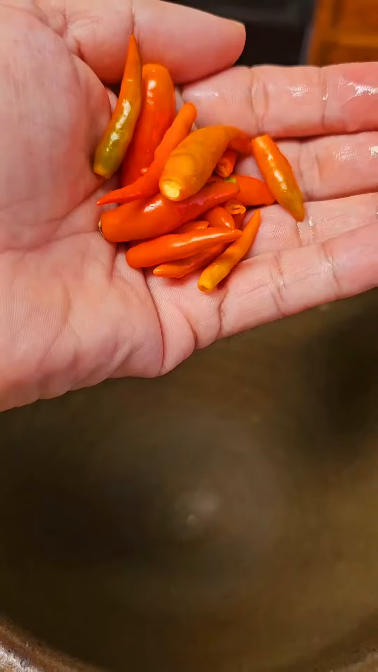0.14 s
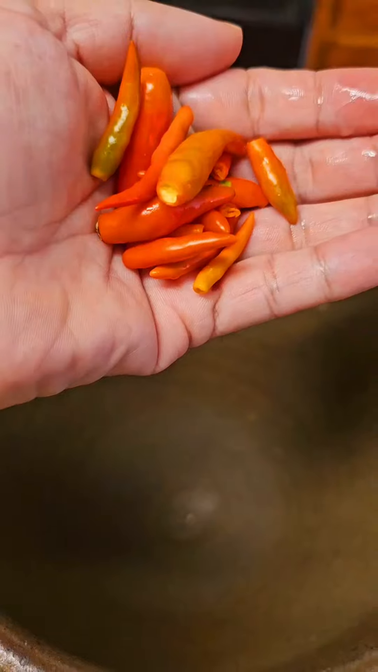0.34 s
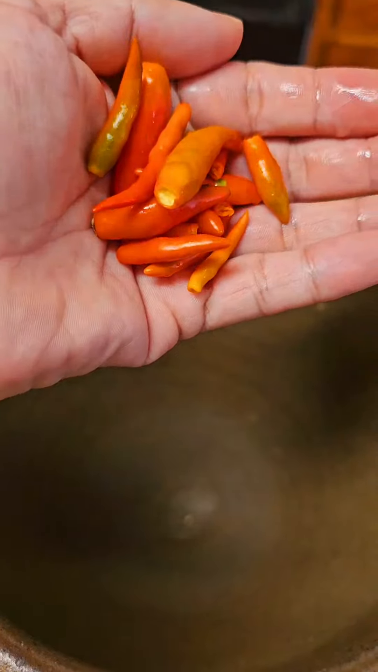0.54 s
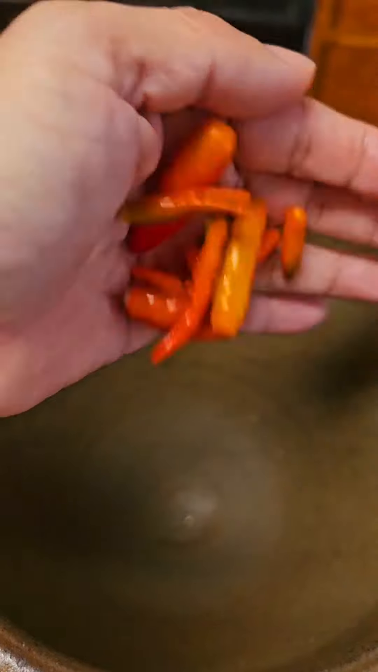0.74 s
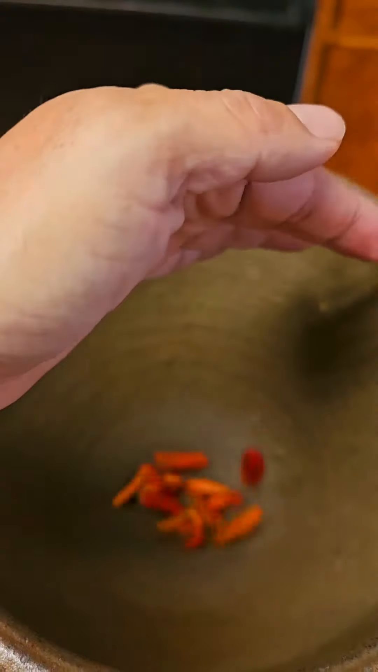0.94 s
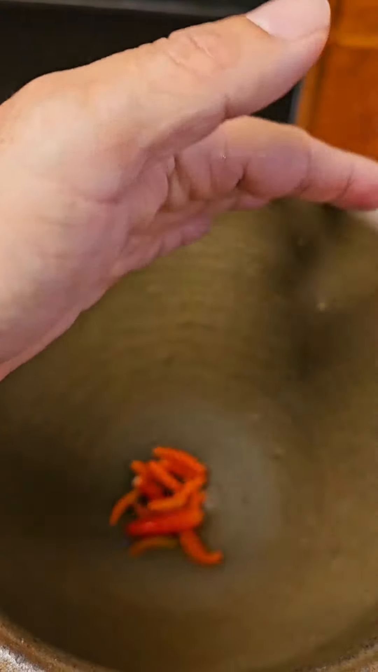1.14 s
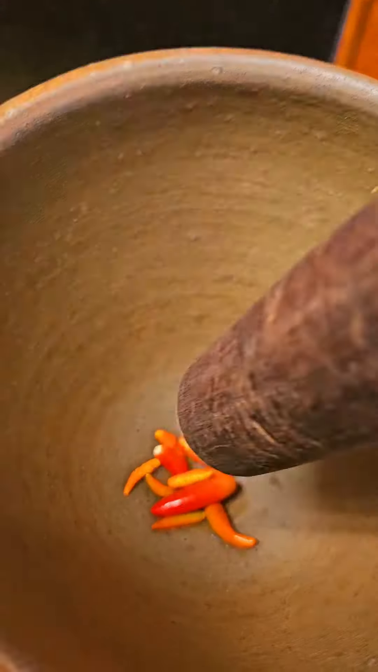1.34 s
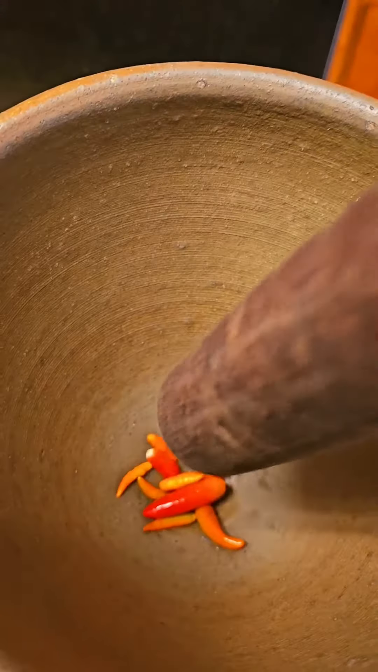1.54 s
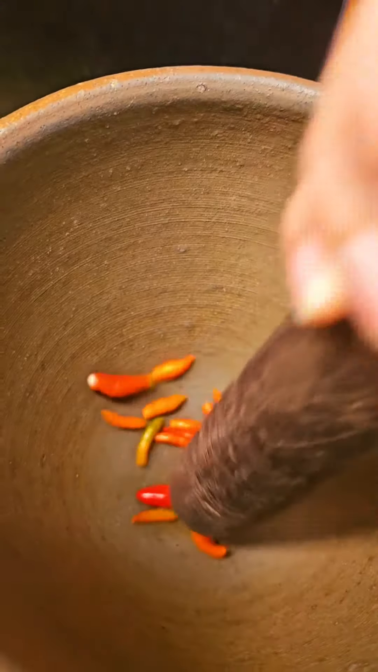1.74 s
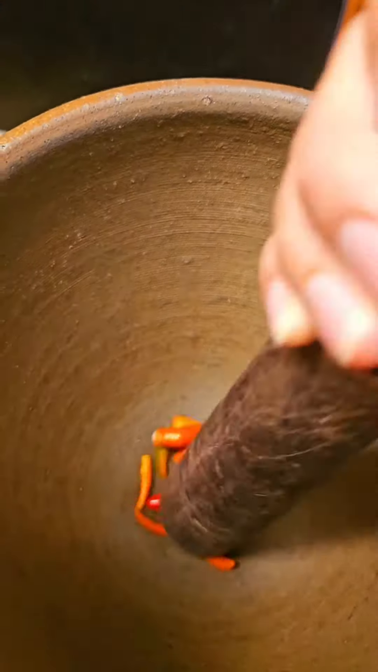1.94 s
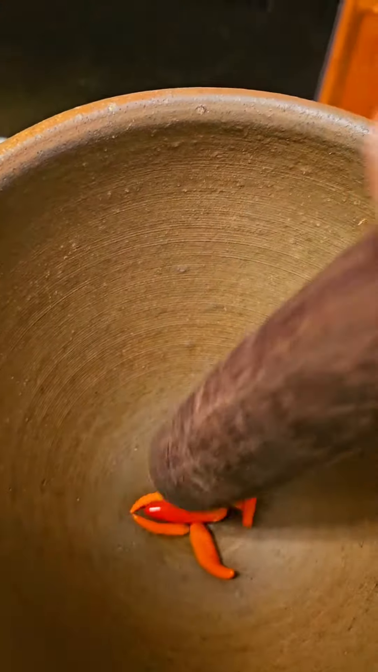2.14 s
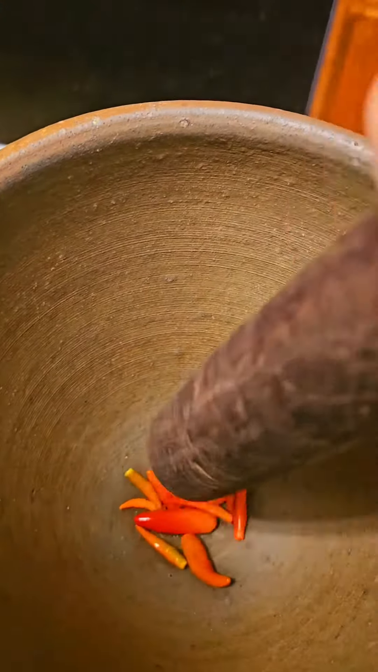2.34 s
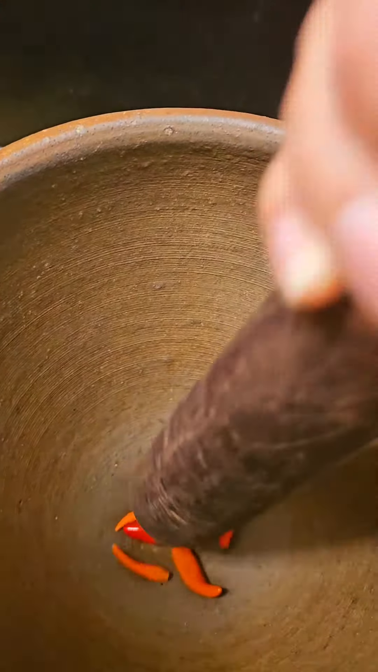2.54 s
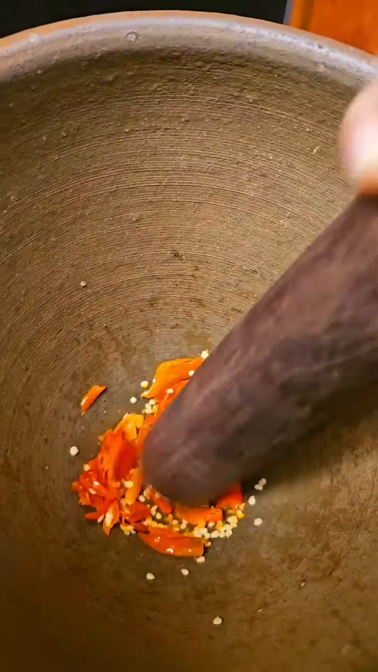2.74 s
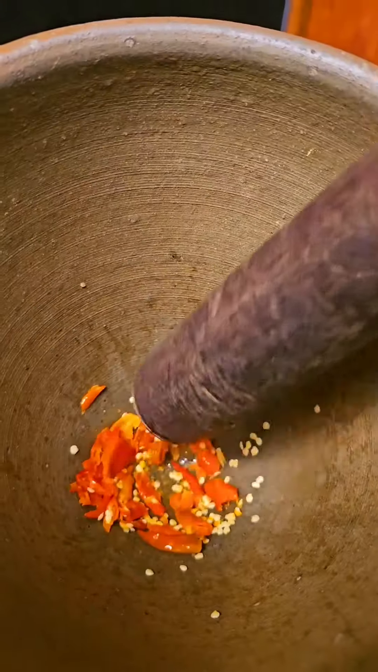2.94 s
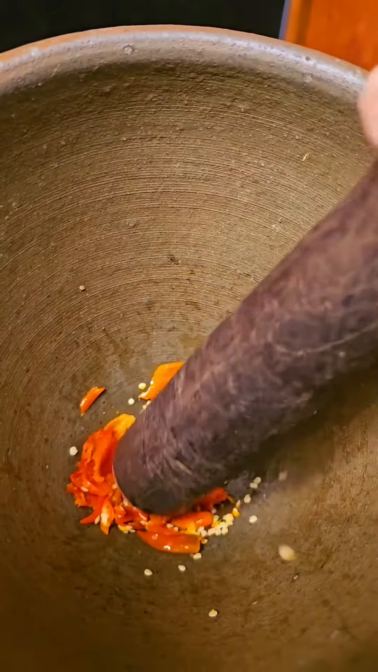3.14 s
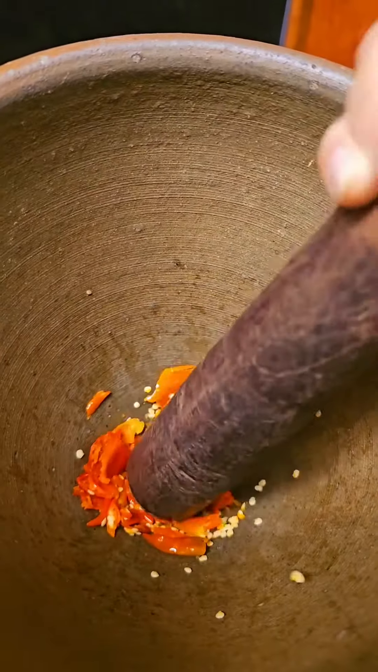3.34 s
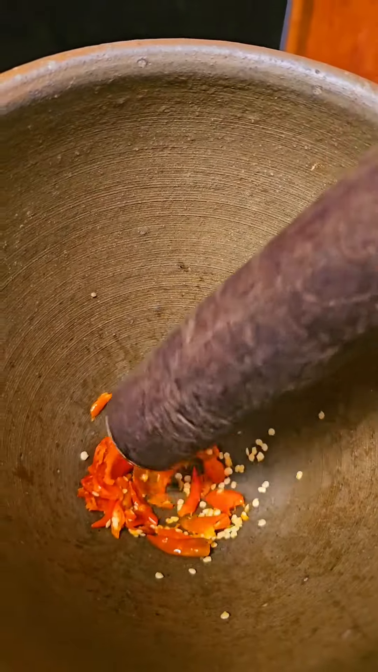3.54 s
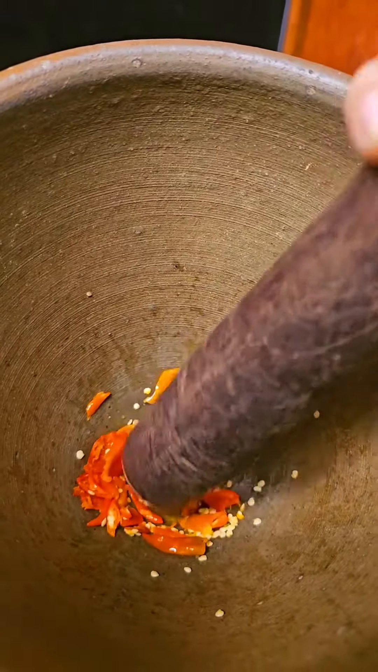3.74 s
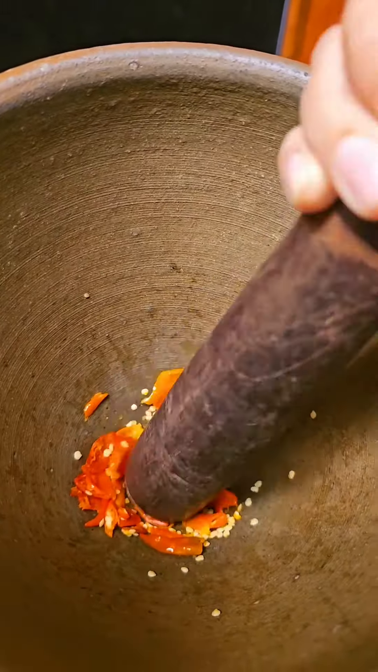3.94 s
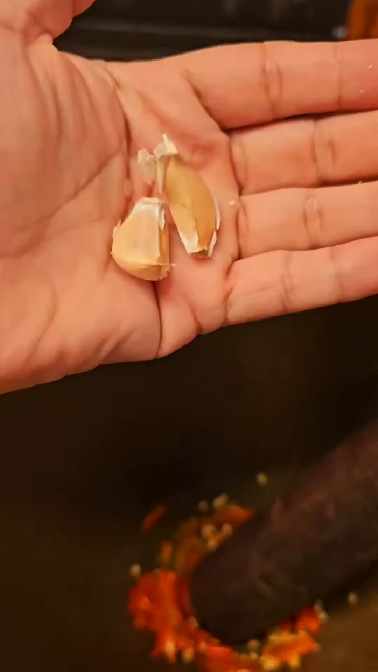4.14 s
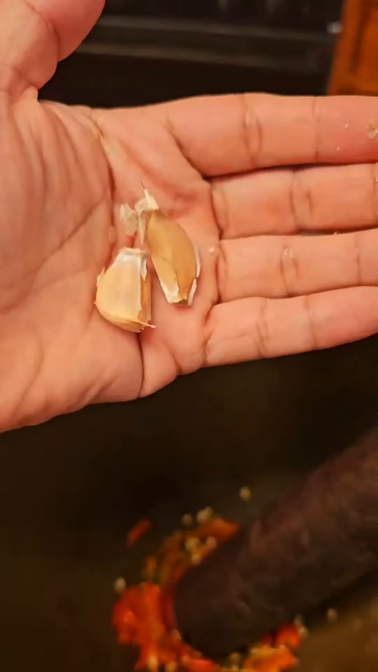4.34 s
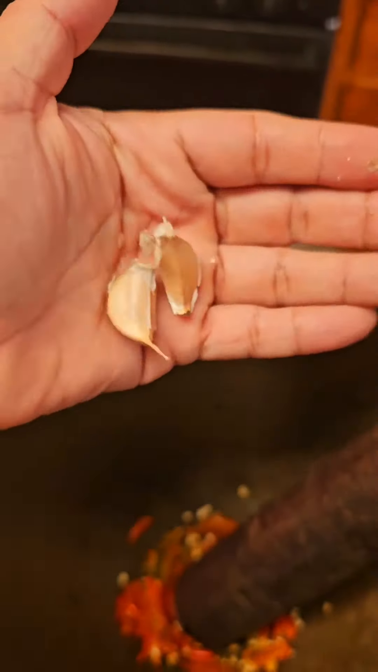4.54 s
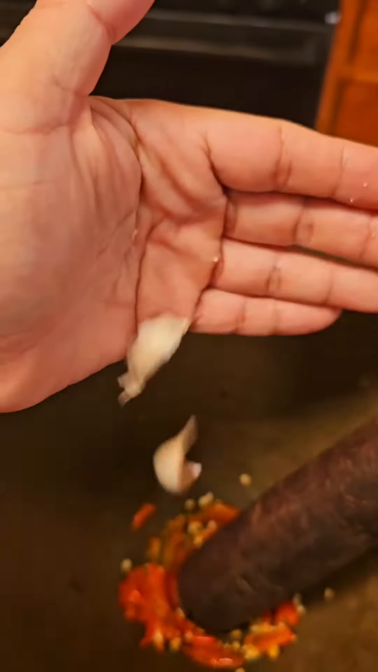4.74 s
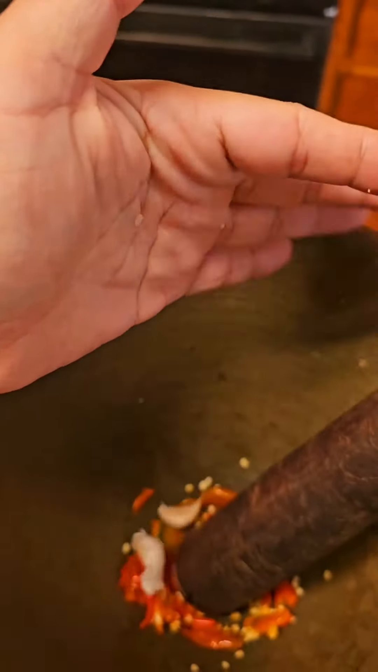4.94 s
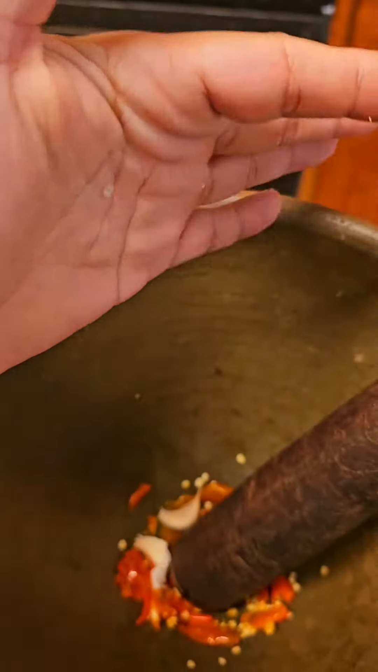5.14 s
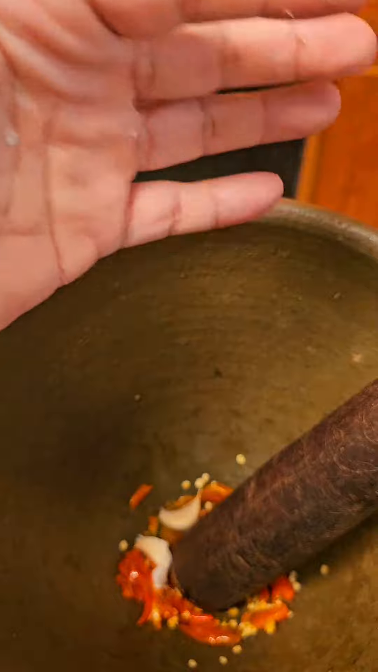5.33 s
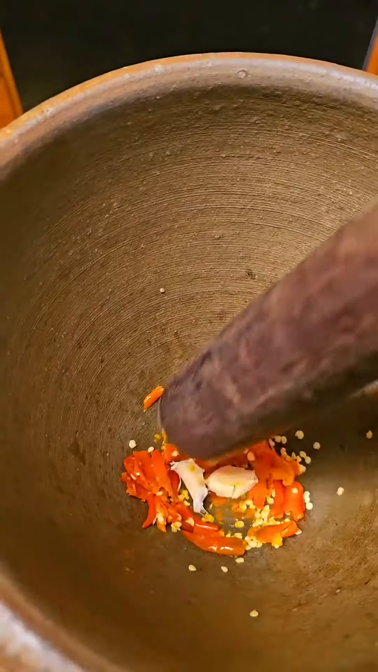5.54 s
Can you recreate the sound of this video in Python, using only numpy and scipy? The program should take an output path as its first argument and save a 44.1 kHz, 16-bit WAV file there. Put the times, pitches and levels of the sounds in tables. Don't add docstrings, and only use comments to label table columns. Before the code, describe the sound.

Small chillies patter faintly into a clay mortar, nine wooden pestle blows thump and crunch them wetly, then garlic cloves tick in, over quiet kitchen hum.

```python
import sys
import numpy as np
from scipy import signal
from scipy.fft import rfft, irfft, next_fast_len
from scipy.io import wavfile
from scipy.ndimage import uniform_filter1d

SR = 44100
rng = np.random.default_rng(int(sys.argv[2]) if len(sys.argv) > 2 else 0)


def master(y):
    cut = np.clip(np.atleast_2d(y).T, -1, 1)
    pcm = np.round(cut * 32767)
    wavfile.write(sys.argv[1], SR, pcm.astype(np.int16))


def field_ratio(decibels):
    return 10 ** (np.asarray(decibels, dtype=float) / 20)


N = 246078

# (start [s], end [s], fade-in [s], room tone [dB], treble hiss [dB])
TAKES = [
    (0.08, 1.435, 0.017, 1.5, 6.5),
    (1.463, 2.717, 0.014, 2, 8.5),
    (2.721, 4.143, 0.0051, 0.64, -4),
    (4.142, 5.437, 0.017, 0.6, 8),
    (5.435, 5.601, 0.00087, 1.7, 6.5),
]
# (pitch [Hz], level [dB], t60 [s], right lag [rad], right level [dB])
BOWL_AIR_MODES = [(496.7, 9.5, 0.098, 1.68, -1.5), (472.2, -1.5, 0.26, 1.2, 1), (520, -8, 0.6, 1.5, -5),
                  (615, -8.5, 0.033, 1.1, -9), (960, -14, 0.032, 0.59, -2)]


def evened(x):
    return x / np.sqrt(np.mean(x ** 2) + 1e-20)


def read(points, hz):
    f, value = np.transpose(points)
    return np.interp(np.log(hz + 1), np.log(f + 1), value)


def resonances(peaks, hz):
    return sum(db / (1 + (2 * (hz - f) / width) ** 2) for f, width, db in peaks)


def panned(db):
    return np.array([[db], [-db]]) / 2


def add(mix, s, sound):
    part = mix[:, round(s * SR):][:, :sound.shape[1]]
    part += sound[:, :part.shape[1]]


def ring(modes, contact_ms, free=0.71, pan_db=0, rise_ms=.01):
    t = np.arange(SR // 3) / SR
    push = signal.windows.hann(max(round(contact_ms * SR / 1000), 3) + 2)
    out = np.zeros((2, len(t)))
    for hz, db, t60, lag, right_db in modes:
        delay = np.array([[0], [lag / (2 * np.pi * hz)]])
        late = np.maximum(t - delay, 0)
        level_db = db + np.array([[0], [right_db]]) - 60 * late / (t60 * free)
        out += field_ratio(level_db) * np.sin(2 * np.pi * hz * late)
    out = out * (1 - np.exp(-t * 1000 / rise_ms))
    out = signal.oaconvolve(out, push[None], axes=1)[:, :len(t)]
    return out / abs(out).max() * field_ratio(panned(pan_db))


def pestle():
    # (time [s], thump [dB], contact [ms], bowl air [dB], clay wall [dB])
    blows = [
        (1.7788, -15, 0.8, -10, -2.5),
        (2.0317, -19.5, 3.1, -26.5, -22),
        (2.2941, -7, 2.8, -34, -38.5),
        (2.5267, -10, 4.5, -32.5, -33),
        (2.8355, -11, 1.3, -19.5, -40),
        (3.144, -8, 1.1, -13.5, -33),
        (3.434, -7.5, 1.6, -10, -23.5),
        (3.7337, -7, 1.4, -15, -25.5),
        (4.0263, -13.5, 1.3, -17, -46),
    ]
    # (counter boom [dB], upper thump [dB], rocking [dB], bass left-right [dB], wall left-right [dB])
    stances = [(-23.5, 9, -41.5, -7, 0.5), (-23, -12, -41.5, -8.5, -3.5), (-24, -3.5, -32, 0, -0.5),
               (-27, -16, -29.5, -3, 7.5), (-23.5, 5.5, -33, 2, -8.5), (-23.5, -0.5, -34.5, 0, -13.5),
               (-26, 3.5, -32, 0.5, -12.5), (-26, -2.5, -33, 3, 6), (-26.5, -2, -36.5, 5, -2.5)]
    # (time [s], thump [dB], counter boom [dB])
    rebounds = [
        (2.0442, -30.5, -26.5),
        (2.306, -22.5, -19),
        (2.5403, -25.5, -28.5),
        (2.845, -28.5, -22.5),
        (4.037, -34, -29),
        (5.45, -38, -33.5),
        (5.498, -54, -36),
    ]
    # (pitch [Hz], level [dB], t60 [s], right lag [rad], right level [dB])
    counter = [(71.2, 7.5, 0.058, 0.23, 3), (49, -0.5, 0.15, .25, 4), (110, -2.5, .05, .25, -2)]
    thump = [(186, -5.5, 0.038, 0.11, 0), (277.4, -3.5, 0.035, 0.1, 0.5)]
    rock = [(160.6, 1.5, 0.29, .1, 0.0027), (207.8, -7.5, .2, 0.12, 0.0054), (154, -4.5, 0.21, .1, 0.0041)]
    clay = [(1293, -7, 0.3, 1.9, -6.5), (1234, -4, 0.15, 1.1, -4), (860, 3.5, 0.02, 0.42, -5.5),
            (1240, 2.5, 0.039, 2.3, -12), (1460, -12, 0.036, 0.66, -6.5), (2230, -21, 0.25, 1.3, -1),
            (988, -5.5, 0.025, 0.56, -4.5)]
    rebound_ms, rebound_air_db, rebound_clay_db = 4.6, -3.5, -14.5
    sag_per_ms, damp_per_ms = 0.089, 0.25
    suck_db, suck_ms = -17.5, 5.1

    hits = [(*blow, *stance) for blow, stance in zip(blows, stances)]
    for s, db, boom_db in rebounds:
        hits.append((s, db, rebound_ms, db + rebound_air_db, db + rebound_clay_db,
                     boom_db, -4, db - 14, 0, 0))
    suck = signal.windows.hann(round(suck_ms * SR / 1000)) * np.ones((2, 1))
    out = np.zeros((2, N))
    for s, thump_db, ms, air_db, clay_db, boom_db, upper_db, rock_db, bass_db, wall_db in hits:
        longer_ms = ms - 1.3
        slower = [(hz / (1 + sag_per_ms * longer_ms), db + k * upper_db, *rest)
                  for k, (hz, db, *rest) in enumerate(thump)]
        add(out, s - suck_ms / 1000 * 0.65, -field_ratio(thump_db + suck_db) * suck)
        add(out, s, field_ratio(thump_db) * ring(slower, ms, 0.57 / (1 + damp_per_ms * longer_ms), bass_db))
        add(out, s, field_ratio(boom_db) * ring(counter, ms, 0.35, bass_db))
        add(out, s, field_ratio(rock_db) * ring(rock, 2.2, .9, bass_db, 9.3))
        add(out, s - .0008, -field_ratio(air_db) * ring(BOWL_AIR_MODES, min(ms, 1.6)))
        add(out, s, -field_ratio(clay_db) * ring(clay, 0.62, 0.35, wall_db))
    return out


def squelch():
    # (time [s], level [dB], fall [dB/s], pitch share [1], left-right [dB])
    squelches = [(2.026, -38.5, 248.5, 1, 5.5), (2.288, -32, 246.5, 1.02, 1.5),
                 (2.525, -35, 304.5, 1, -1.5), (2.558, -35.5, 220.5, 1.03, 5), (2.838, -47.5, 302, 1, 5.5),
                 (3.145, -49, 299, 1, -1), (3.44, -41, 298, 1, 3), (3.735, -37, 300, 1, -3),
                 (4.028, -39.5, 301, 1, 4)]
    # (pitch [Hz], width [Hz], level [dB])
    pulp = [(345, 77, 0.5), (540, 76, -3), (778, 56, -5), (1090, 75, -12), (1300, 82, -6)]
    size = 8192
    out = np.zeros((2, N))
    t, hz = np.arange(size) / SR, np.fft.rfftfreq(size, 1 / SR)
    noises = rng.standard_normal((len(squelches), 3, size))
    for (s, db, fall, share, pan_db), (a, b, lumps) in zip(squelches, noises):
        colour = sum(field_ratio(p_db) / (1 + (2 * (hz - f * share) / width) ** 2) for f, width, p_db in pulp)
        pair = np.array([a, 0.6 * np.roll(a, 12) + 0.64 * b])
        pair = pair * field_ratio(3.0 * evened(uniform_filter1d(lumps, 200)))
        level = field_ratio(db - fall * t + panned(pan_db))
        level = level * np.minimum(t / .004, 1) * signal.windows.tukey(size, .1)
        add(out, s - .008, level * evened(irfft(rfft(pair) * colour, size)))
    return out


def snaps(noise, tilt_db, grain_db, peak_hz=5000, peak_db=0, body_db=0):
    # (pitch [Hz], level [dB/Hz])
    crunch = [(590, -2.5), (1000, -7), (2620, -7.5), (3390, -5), (4820, -7), (5290, -8), (7260, -7.5),
              (10600, -9.5), (11500, -7.5), (15700, -9.5), (16700, -24)]
    # (pitch [Hz], width [Hz], level [dB])
    crunch_peaks = [(2240, 50, 5), (2920, 78, -0.5), (3494, 430, -6), (4810, 63, 14), (7050, 43, 0.5),
                    (8100, 23, -9), (8800, 28, -7), (11500, 43, -6.5)]
    left, right, grain = noise
    hz = np.fft.rfftfreq(len(left), 1 / SR)
    octaves = np.log2(np.maximum(hz, 1900) / 5000)
    colour_db = read(crunch, hz) + np.clip(tilt_db, -7, 7) * octaves
    colour_db = colour_db + peak_db / (1 + ((hz / peak_hz - 1) / 0.1) ** 2)
    colour_db = colour_db + body_db * np.clip(np.log2(2700 / (hz + 1)), 0, 1)
    colour_db = colour_db + 0.46 * resonances(crunch_peaks, hz)
    pair = np.array([left, 0.088 * np.roll(left, 14) + 0.73 * right])
    pair = pair * field_ratio(grain_db * evened(uniform_filter1d(grain, 30)).clip(-3, 2))
    return evened(irfft(rfft(pair) * field_ratio(colour_db) * (hz > 500), len(left)))


def crackle(rows, fall_ms, split_ms, body_db, squeeze_db, grain_db, peak_db, split_db, blurred=False):
    # (pitch [Hz], width [Hz], level [dB])
    bowl_bands = [(2230, 150, 1), (3550, 400, 1.5), (4900, 350, 0), (6100, 300, 1.5), (7200, 500, 2.5),
                  (10400, 400, -5.5), (11600, 500, 2.5), (13300, 500, 0.5), (15600, 600, 2.5)]
    size, lead = 4096, 1536
    blur_hz, port_lag = 379, 7
    t = (np.arange(size) - lead) / SR * 1000
    swell = np.exp(np.minimum(t / (0.25 * fall_ms), -t / fall_ms))
    swell = swell + field_ratio(squeeze_db) * np.exp(np.minimum(t / 8.0, -t / 14))
    swell = swell + field_ratio(split_db) * np.exp(-abs(t) / split_ms)
    bands_db = resonances(bowl_bands, np.fft.rfftfreq(size, 1 / SR))
    out = np.zeros((2, N + lead))
    noises = rng.standard_normal((len(rows), 3, size))
    for (s, db, pan_db, hz, tilt_db), noise in zip(rows, noises):
        burst = swell * snaps(noise, tilt_db, grain_db, hz, peak_db, body_db)
        burst = burst * np.linalg.norm(swell) / np.linalg.norm(burst, axis=1, keepdims=True)
        if blurred:
            power = uniform_filter1d(abs(rfft(burst)) ** 2, round(blur_hz * size / SR), axis=1)
            click = irfft(np.sqrt(abs(power)), size)
            burst = np.array([np.roll(click[0], lead), np.roll(click[1], lead + port_lag)])
        burst = irfft(rfft(burst) * field_ratio(bands_db), size)
        add(out, s, field_ratio(db + panned(pan_db)) * burst)
    return out[:, lead:]


def crushing(peak_db, blurred):
    # (time [s], peak [dB], left-right [dB], strongest pitch [Hz], tilt [dB/octave])
    bursts = [(1.7606, -42, 9.5, 3060, -9), (1.7664, -32, 11.5, 3330, -0.5), (1.7765, -23.5, -1, 2820, 0),
              (2.0268, -30.5, -1.5, 3950, -3), (2.0327, -22.5, 8, 7300, 4.5), (2.29, -27, 10.5, 2094, -6.5),
              (2.2927, -19, 9.5, 3240, 3), (2.2998, -22.5, -6, 3440, 4), (2.3076, -22, 0, 6390, 3),
              (2.3138, -29.5, 3.5, 2230, -8.5), (2.5232, -26, 12.5, 3150, -1),
              (2.5272, -18, 6.5, 5000, 0.5), (2.5336, -22.5, 6, 3410, 1), (2.5414, -16, 2, 7200, 3.5),
              (2.8354, -19.5, 9, 6770, 4.5), (2.84, -23, 0.5, 4650, 3.5), (2.8469, -19.5, -7.5, 4896, 3.5),
              (3.1441, -14.5, 3, 7460, 2.5), (3.1505, -25.5, 4, 5000, -0.5), (3.4343, -15.5, 10, 5010, -1),
              (3.4455, -27, -6, 2270, -2.5), (3.7333, -13, 3.5, 9490, 2), (3.7498, -35, -0.5, 7050, -4),
              (4.0268, -19.5, 2, 7700, 1), (4.035, -32.5, 7.5, 4910, 2), (4.0459, -32.5, 1, 4840, 2)]
    return field_ratio(-3.5) * crackle(bursts, fall_ms=4.76, split_ms=0.69, body_db=-2.5, squeeze_db=-22.0,
                               grain_db=2.7, peak_db=peak_db, split_db=1.0, blurred=blurred)


def popping(peak_db):
    # (time [s], peak [dB], left-right [dB], strongest pitch [Hz], tilt [dB/octave])
    pops = [(2.0326, -5.5, 7, 8370, 2.5), (2.0243, -28.5, 1, 1990, -6.5), (2.0295, -27, 3, 2250, -4),
            (2.2887, -30, 4.5, 1910, -8), (2.2912, -23.5, 5, 2080, -5), (2.2946, -18.5, 5, 7200, 0),
            (2.3098, -18, 0.5, 6560, 5.5), (2.3163, -29, -2.5, 4000, 0), (2.5228, -30, 1, 2600, -2.5),
            (2.5279, -12, 5.5, 3400, -1.5), (2.5431, -13.5, 1.5, 7900, 6.5), (2.551, -24, 0, 12000, 7.5),
            (2.8424, -22.5, -1.5, 4650, 0.5), (2.862, -32.5, -1, 6930, -0.5), (3.1441, -11, 1, 7600, 2),
            (3.4342, -19.5, 7, 5060, 7.5), (3.7333, -17, -2.5, 6400, 3.5), (4.0268, -11, 3.5, 5650, 10),
            (4.0312, -22.5, 4.5, 4900, 0.5)]
    return field_ratio(-5.5) * crackle(pops, fall_ms=1.7, split_ms=0.19, body_db=-3.5, squeeze_db=-41.0,
                               grain_db=1.5, peak_db=peak_db + 5.5, split_db=-3.0, blurred=True)


def knocks():
    # (time [s], bowl air [dB], clay wall [dB], share of the free ring time [1], upper wall modes [dB])
    taps = [(1.037, -29.5, -45, 0.29, 0), (1.048, -35, -38, 0.21, 0), (1.065, -42, -43, 0.32, 0),
            (1.097, -39, -56, 0.83, 0), (1.113, -34, -34.5, 0.11, -3), (1.232, -60, -64, 0.44, 0),
            (4.896, -46, -39.5, 1.05, 3), (4.979, -49, -34.5, 1.06, 2), (5.05, -58, -58, .4, -3),
            (5.059, -58.5, -45.5, 0.59, 19), (5.1, -68, -50, 1.4, 5), (1.088, -35.5, -55, 0.15, -3),
            (1.126, -43, -46, 0.18, 0), (1.1608, -62, -61, .3, 0), (1.2113, -61, -54.5, 0.29, 0),
            (1.2625, -62, -62, .3, 0), (2.0241, -50, -34, 0.12, -2), (2.028, -51, -36, 0.096, 0),
            (2.286, -51, -39, 0.19, 3), (2.2912, -38, -28, 0.15, 8), (4.3855, -60, -54, 0.1, 0)]
    # (pitch [Hz], level [dB], t60 [s], right lag [rad], right level [dB])
    clink = [(1282, -4.5, 0.1, 5.05, 1), (1298, -8.5, 0.097, 5.5, -3.5), (1940, -19.5, 0.02, 5.8, 3.5),
             (3150, -6, 0.03, 1.2, -15.5), (6100, -17, .04, 1.3, -0.5)]
    out = np.zeros((2, N))
    for s, air_db, clay_db, free, upper_db in taps:
        wall = [(hz, db + upper_db * (hz > 2500), *rest) for hz, db, *rest in clink]
        add(out, s, field_ratio(air_db) * ring(BOWL_AIR_MODES, 0.77, free))
        add(out, s, field_ratio(clay_db) * ring(wall, 0.12, free, 0, rise_ms=3.8))
    return out


def tumbling():
    # (time [s], peak [dB], left-right [dB], strongest pitch [Hz])
    landings = [(1.0287, -51, 21, 5570), (1.0363, -45, 8, 2530), (1.04, -42, 21.5, 5070),
                (1.0505, -36, 10, 2280), (1.0576, -42, 4, 2230), (1.063, -40.5, 7, 2450),
                (1.0814, -48, 19, 3850), (1.0899, -42, 16, 3000), (1.097, -38.5, 10, 5400),
                (1.104, -48.5, 16, 2330), (1.111, -38, 13.5, 4900), (1.116, -49.5, 13, 2290),
                (1.1274, -51, 14, 1473), (1.1446, -50.5, 12, 5000), (1.154, -54, 21, 3180),
                (1.172, -52.5, 12, 6160), (1.2112, -53, 12.5, 3270), (1.218, -57, 11, 5200),
                (1.2313, -49.5, 14, 3736), (1.136, -57, 10, 4500), (1.162, -53, 12, 7300),
                (1.287, -61, 10, 6560), (1.238, -58, 12, 3150), (1.265, -60, 14, 5550)]
    rows = [(*landing, -2) for landing in landings]
    return crackle(rows, fall_ms=1.4, split_ms=0.41, body_db=4.4, squeeze_db=-19.5,
                   grain_db=4.9, peak_db=10.2, split_db=-24.5)


def ticking():
    # (time [s], peak [dB], left-right [dB], strongest pitch [Hz])
    ticks = [(0.488, -66.5, 3, 3080), (0.502, -67, -4, 3060), (2.9758, -55.5, 5, 4900),
             (3.3129, -59.5, 0.5, 4110), (3.656, -63, 6.5, 2950), (3.9115, -59.5, 9.5, 6950),
             (4.341, -56, 1, 7630), (4.348, -61, 0, 11600), (4.3535, -49.5, 1, 5110),
             (4.376, -52.5, -9, 4900), (4.3841, -65.5, -3, 1950), (4.402, -63, -5, 7140),
             (1.867, -49.5, 2, 14600), (1.901, -57, 2.5, 4200), (1.918, -45.5, -11.5, 13000),
             (1.943, -42.5, -3, 12500), (2.0063, -46, 5.5, 3200), (0.797, -83, -3, 3020),
             (1.479, -80, 2, 2000), (4.6722, -62.5, 12, 5470), (4.817, -50, 10.5, 8930),
             (4.835, -50.5, 9, 9650), (4.8954, -32, 13, 11800), (4.969, -37, 25, 11500),
             (5.029, -48, 14, 4220), (5.0637, -59.5, 13, 6100), (5.095, -55.5, 16.5, 9100),
             (5.1387, -64, 11, 6230), (5.4769, -32, 7.5, 14030), (5.483, -42.5, -7, 4330),
             (5.5724, -52, 6, 13700)]
    rows = [(*tick, 4.5) for tick in ticks]
    return crackle(rows, fall_ms=1.8, split_ms=.45, body_db=-1.2, squeeze_db=-27.5,
                   grain_db=3.5, peak_db=6.6, split_db=-8.5)


def rustle():
    # (loudest time [s], rise [s], level [dB], fall [dB/s], tilt [dB/octave])
    spells = [(0.444, .03, -72, 116, -13), (0.489, 0.011, -65, 197, -13), (0.847, .021, -85, 65, -6),
              (1.039, .022, -47, 149, -10), (1.145, .03, -65, 250, -14), (1.236, .05, -59, 234, -8),
              (1.643, 0.046, -70.5, 15.5, -6), (1.758, 0.013, -64, 301.5, -5.5),
              (1.906, .28, -54.5, 403.5, 6), (1.918, .012, -49, 69.5, 2), (2.02, .03, -52, 905.5, 1),
              (2.727, .021, -67.5, 247.5, -3), (2.821, 0.019, -61, 495, -6.5), (4.216, .2, -72.5, 28.5, -1),
              (4.345, .008, -62, 102, 2), (4.39, .03, -60, 126, -8), (4.672, 0.33, -69.5, 71.5, 5),
              (4.818, 0.019, -53, 780, 7.5), (4.902, 0.021, -44.5, 499.5, 2), (4.972, .012, -37, 849, 8),
              (5.001, .03, -59.5, 103, -6), (5.443, .003, -41.5, 155, 3), (5.484, .03, -55, 199, 5),
              (4.745, .01, -76.5, 62, 5)]
    rise_db, fade_db = 27, 32.5
    size = 16384
    out = np.zeros((2, N))
    noises = rng.standard_normal((len(spells), 4, size))
    for (s, rise, db, fall, tilt_db), noise in zip(spells, noises):
        t = np.arange(-rise, fade_db / fall, 1 / SR)[:size]
        clumps = uniform_filter1d(uniform_filter1d(noise[3], 120), 120)
        clumps_db = 1.1 * evened(clumps)[:len(t)]
        bright = np.clip(tilt_db / 8 + .5, 0, 1)
        dull_sound = snaps(noise[:3], -4.0, 1.5)[:, :len(t)]
        bright_sound = snaps(noise[:3], 2.9, 2.2)[:, :len(t)]
        sound = (1 - bright) * dull_sound + bright * bright_sound
        level_db = db + np.minimum(rise_db * t / rise, -fall * t)
        fade = signal.windows.tukey(len(t), 200 / len(t))
        add(out, s - rise, field_ratio(level_db + clumps_db + panned(3)) * fade * sound)
    return out


def kitchen_echo():
    # (pitch [Hz], t60 [s])
    die_away = [(60, 0.38), (250, 0.21), (1000, 0.33), (4000, 0.35), (14000, 0.28)]
    taps = np.zeros((2, SR // 2))
    at = np.arange(130, SR // 2 - 20, 20)
    at = at + rng.integers(0, 20, (2, len(at)))
    np.put_along_axis(taps, at, rng.choice([-1., 1.], at.shape), 1)
    hz, t, z = signal.stft(taps, SR, nperseg=256)
    z[1] = np.where(hz[:, None] < 300, z[0], z[1])
    z = z * field_ratio(-60 * t / read(die_away, hz)[:, None])
    tail = signal.istft(z, SR, nperseg=256)[1]
    return tail / np.linalg.norm(tail[0])


def reverberate(send):
    t, wet = np.arange(N) / SR, np.zeros((2, N))
    echoes = [kitchen_echo() for _ in range(3)]
    for start, end, *_ in TAKES:
        inside = (t >= start) & (t < end)
        for k, echo in enumerate(echoes):
            turn = np.sqrt(2 / 3) * np.cos(np.pi * (t / 0.88 + k / 3))
            heard = signal.fftconvolve((send * turn)[None, inside], echo, axes=1)
            wet[:, inside] += heard[:, :inside.sum()]
    return wet


def room_tone(treble_db):
    # (pitch [Hz], level [dB/Hz])
    air = [(12, -53.5), (20, -12.5), (44, 3.5), (67, -3), (89, -14), (240, -0.5), (309, -4.5), (398, -11.5),
           (575, -13), (903, -23.5), (1500, -27.5), (1780, -29.5), (2790, -45), (3600, -50.5),
           (7500, -56.5), (8300, -66), (11500, -57.5), (17000, -62.5)]
    # (pitch [Hz], left-right likeness [1])
    likeness = [(60, 0.93), (180, 0.99), (550, 0.42), (1650, -0.19), (4970, -0.099), (15000, 0.068)]
    # (pitch [Hz], level [dB])
    hum = [(59.2, -56), (145.3, -62.5), (242.2, -63.5), (296.1, -66), (581.4, -75.5)]
    air_db, whine_hz, whine_db = -54, 1530, -81.5
    frames, hz = N // 256 + 5, np.fft.rfftfreq(1024, 1 / SR)
    a, b, c, d, patches = rng.standard_normal((frames, 513, 5)).T
    patches = evened(uniform_filter1d(uniform_filter1d(patches, 10, 0), 12, 1))
    same = np.clip(read(likeness, hz), -1, 1)[:, None]
    left = a + 1j * b
    z = np.array([left, same * left + np.sqrt(1 - same ** 2) * (c + 1j * d)])
    hiss_db = treble_db[np.minimum(np.arange(frames) * 256, N - 1)]
    lift_db = np.clip(np.log2((hz + 1) / 1500), 0, 1)[:, None] * hiss_db
    z = z * field_ratio(read(air, hz)[:, None] + 0.51 * patches + lift_db)
    out = field_ratio(air_db) * evened(signal.istft(z, nperseg=1024, noverlap=768)[1][:, :N])
    for f, db in hum:
        waver = evened(uniform_filter1d(uniform_filter1d(rng.standard_normal(N), 1800), 1800))
        phase = 2 * np.pi * np.cumsum(f + 1.5 * waver[::-1]) / SR
        out = out + field_ratio(db + 0.91 * waver) * np.sin(phase)
    t = np.arange(N) / SR
    first_take = t < TAKES[0][1]
    return out + field_ratio(whine_db) * first_take * np.sin(2 * np.pi * whine_hz * t)


def scene():
    # (pitch [Hz], width [Hz], level [dB])
    wall_streaks = [(2230, 83, 6), (3650, 110, 4.5), (4900, 110, 5.5), (6100, 130, 2.5), (7150, 110, 4.5),
                    (2650, 200, -4), (4200, 230, -4)]
    body = pestle() + knocks() + squelch()
    near = crushing(8, False) + popping(8)
    spread = crushing(2.5, True) + popping(2.5)
    loose = ticking() + tumbling() + field_ratio(-0.5) * rustle()

    size = next_fast_len(N)
    streaks_db = resonances(wall_streaks, np.fft.rfftfreq(size, 1 / SR))
    far = irfft(rfft(spread, size) * field_ratio(streaks_db), size)[:, :N] + loose
    send = field_ratio(-8.5) * body.mean(0) + field_ratio(-16.0) * (far[0] + 0.29 * np.roll(far[1], 170))
    wet = reverberate(send)

    t = np.arange(N) / SR
    gate, tone_db, treble_db = np.zeros(N), np.zeros(N), np.zeros(N)
    for start, end, fade, db, hiss_db in TAKES:
        inside = (t >= start) & (t < end)
        gate += inside * np.minimum((t - start) / fade, (end - t) / 0.0031).clip(0, 1)
        tone_db += inside * db
        treble_db += inside * hiss_db
    gate = np.maximum(gate, field_ratio(-29) * (t > TAKES[0][0]))
    return gate * (body + near + loose + wet + field_ratio(tone_db) * room_tone(treble_db))


def roll_off(x):
    return signal.sosfilt(signal.butter(12, 17150, fs=SR, output="sos"), x)


def record(dry):
    # (pitch [Hz], level [dB])
    microphone = [(3000, 0.49), (7600, 1.15), (8700, -2), (10000, -3), (11500, -3.5), (16000, -6)]
    click_s, click_db, click_ms = 5.35591, -43, 1.6
    hz = np.fft.rfftfreq(N, 1 / SR)
    heard = irfft(rfft(dry) * field_ratio(read(microphone, hz)), N)
    heard = signal.sosfilt(signal.butter(2, 28, "high", fs=SR, output="sos"), heard)
    heard = heard / (1 + abs(heard / .92) ** 5) ** .2
    heard = heard * (np.arange(N) > TAKES[0][0] * SR)
    after = np.arange(N) / SR - click_s
    heard = heard - field_ratio(click_db) * (after >= 0) * np.exp(-abs(after) * 1000 / click_ms)
    heard = irfft(rfft(heard) * (hz < 17150), N)
    return roll_off(heard)


dry = scene()
out = record(dry)
master(out)
```